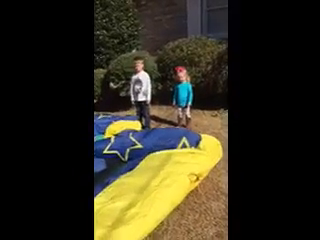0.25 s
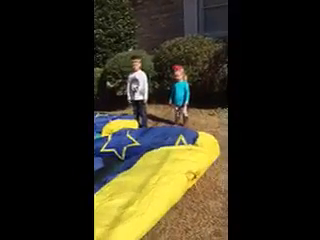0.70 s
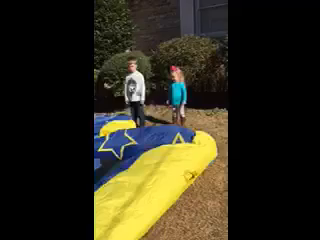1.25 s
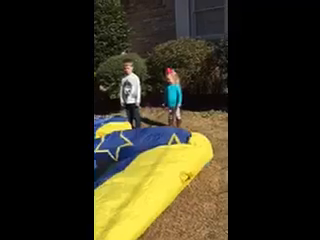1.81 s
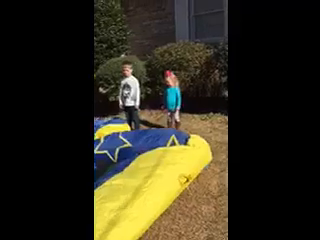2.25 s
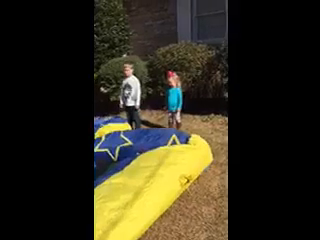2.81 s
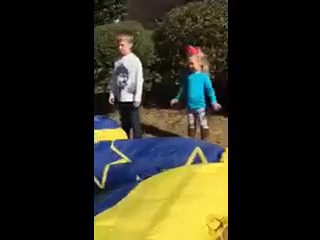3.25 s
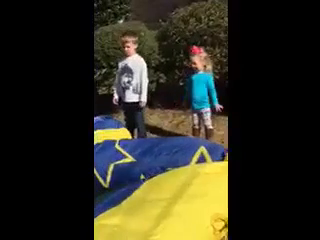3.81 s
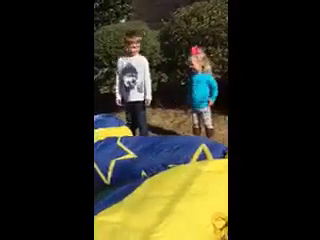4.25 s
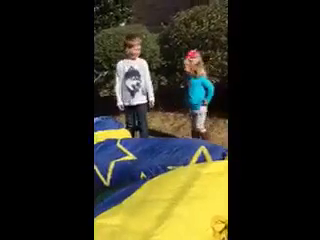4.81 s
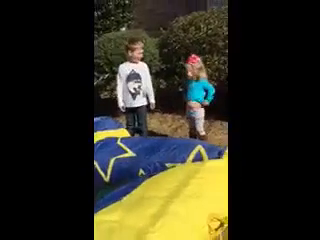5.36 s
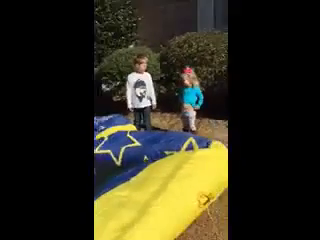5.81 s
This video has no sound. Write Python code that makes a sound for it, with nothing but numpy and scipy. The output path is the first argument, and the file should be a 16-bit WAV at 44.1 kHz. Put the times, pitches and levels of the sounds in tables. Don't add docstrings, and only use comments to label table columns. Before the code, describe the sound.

An electric blower roars steadily outdoors, inflating a large bag, with a broad airy rush, nasal whine and faint flickering blade tones throughout.

```python
import sys
import numpy as np
from scipy import signal
from scipy.fft import rfft, irfft, next_fast_len
from scipy.io import wavfile
from scipy.ndimage import uniform_filter1d, map_coordinates

SR = 44100
rng = np.random.default_rng(int(sys.argv[2]) if len(sys.argv) > 2 else 0)


def bounce(signal):
    frames = np.transpose(np.atleast_2d(signal))
    limited = np.clip(frames, -1, 1)
    pcm = np.round(limited * 32767).astype(np.int16)
    wavfile.write(sys.argv[1], SR, pcm)


def invert_db(level):
    return 10 ** (np.asarray(level, dtype=float) / 20)


N = 267246
TIME_S = np.arange(N) / SR

# (time [s], level [dB])
BAG_PRESSURE = [(0, 0), (.3, 1), (.55, -2.5), (.9, -0.5), (1.15, 1.5), (1.35, 1), (1.95, -0.1), (2.3, 0),
                (2.7, 1.2), (3.15, -1), (3.55, 0.5), (3.85, -1.6), (4.1, -2), (4.4, 1.9), (4.85, -1.4),
                (5.2, 2.5), (5.5, -0.5), (6.06, 1)]
# (time [s], strength [dB])
INLET_GULPS = [(.3, 5.5), (.61, -1), (1.19, 2), (1.49, 6), (2.24, 5.5), (2.79, 3), (3.22, 0.5), (4.05, 2),
               (5.15, 4.5), (5.39, 6), (5.84, 3.5)]

# (frequency [Hz], density [dB per Hz])
DUCT_SPECTRUM = [(8.8, -47.5), (15, -18.5), (75, -10), (162, -1.5), (232, -2.5), (292, -1.5), (328, 1.5),
                 (470, -9), (610, -43.5), (1030, -120)]
INLET_SPECTRUM = [(380, -38.5), (450, -6.5), (540, -2), (640, -2.5), (780, -7.5), (900, -6), (960, -4.5),
                  (1100, -9), (1270, -5.5), (1450, -6.5), (1600, -7.5), (2000, -39.5)]
HOUSING_SPECTRUM = [(1400, -24.5), (1600, -3), (1690, 0.5), (1930, -1), (2000, -5), (2200, -10),
                    (2600, -32)]
EDGE_SPECTRUM = [(1400, -32), (1900, -1), (2100, -0.5), (2480, -3), (2590, -5.5), (2700, -5.5), (3250, -13),
                 (3600, -21.5), (4000, -32), (4500, -37), (5300, -45.5), (6200, -61.5)]
HISS_SPECTRUM = [(4600, -20.5), (5400, -4.5), (5900, -1), (6300, -1), (6700, -2.5), (7100, -7),
                 (7450, -17.5), (7700, -24.5), (7800, -42)]

# (time [s], peak level [dB], length [s])
FIRST_SINGING = [(.2, -45, .15), (.5, -47, 0.27), (2.4, -57, .2), (3.0, -55, 0.29), (3.45, -42, 0.11),
                 (3.8, -56, 0.23), (4.05, -46, .15), (4.67, -48, 0.27), (5.12, -49.5, 0.12),
                 (5.5, -50, 0.4), (5.86, -42.5, 0.27)]
SECOND_SINGING = [(.45, -52, .2), (1.373, -46, 0.23), (1.796, -47.5, 0.26), (2.063, -45, 0.1),
                  (2.4, -48, 0.18), (2.7, -44.5, 0.14), (3.15, -51, .4), (3.73, -50.5, .3),
                  (4.054, -42.5, 0.13), (4.523, -43.5, .25), (4.854, -46, 0.32), (5.25, -50.5, 0.18),
                  (5.603, -46, 0.46)]
THIRD_SINGING = [(.5, -46, 0.19), (.9, -50, 0.14), (1.295, -43.5, 0.21), (1.68, -46, 0.3), (2.0, -44, 0.38),
                 (2.5, -41.5, 0.23), (3.098, -42, 0.23), (3.982, -47, 0.22), (4.2, -45.5, 0.17),
                 (4.536, -44, 0.25), (4.8, -45.5, 0.21), (5.397, -51.5, 0.2), (6.007, -49.5, .2)]
FAINT_TONES = [-62.5, -62, -59.5]
SHAFT_ORDERS = (6, 9.1, 16, 18, 38, 48)
SHAFT_LEVELS = [-57.5, -60.5, -59.5, -60.5, -61.5, -65]

# (time [s], pitch [Hz], peak level [dB], life [s])
RINGING_EDDIES = [(0.103, 301, -34, 0.04), (0.181, 323, -28, 0.04), (0.279, 345, -30.2, 0.045),
                  (0.567, 1690, -30, 0.034), (0.816, 291, -33, 0.05), (0.946, 280, -29, 0.044),
                  (1.127, 291, -28, 0.016), (1.53, 269, -27, 0.018), (1.863, 1949, -34, 0.029),
                  (2.693, 323, -32, 0.061), (2.753, 280, -28.5, 0.038), (2.887, 301, -27, 0.028),
                  (3.108, 1949, -32.4, 0.022), (3.221, 1281, -29.5, 0.022), (3.457, 301, -30, 0.022),
                  (3.554, 183, -32.5, 0.024), (3.746, 1723, -30.5, 0.021), (3.773, 323, -30.5, 0.018),
                  (3.894, 1766, -37, 0.05), (3.902, 291, -30, 0.022), (4.303, 258, -27.5, 0.016),
                  (4.493, 301, -30, 0.025), (4.57, 301, -27, 0.026), (5.077, 269, -36, 0.055),
                  (5.151, 614, -27.5, 0.022), (5.222, 280, -25.5, 0.046), (5.4, 517, -29.5, 0.021),
                  (5.556, 312, -30.8, 0.04), (5.669, 334, -29.5, 0.044), (6.019, 1949, -31, 0.02)]
# (time [s], pitch [Hz], peak level [dB], life [s])
SHED_EDDIES = [(0.253, 1780, -31, 0.022), (0.939, 1680, -36, 0.029), (1.316, 1944, -35, 0.04),
               (1.335, 1700, -33.2, 0.034), (1.454, 1766, -33.3, 0.04), (1.638, 1936, -32.5, 0.04),
               (1.789, 1916, -32.6, 0.032), (2.023, 1930, -34, 0.034), (2.083, 1900, -32.8, 0.024),
               (2.127, 1943, -33.0, 0.038), (2.411, 1701, -30, 0.026), (2.502, 1930, -34.5, 0.04),
               (2.726, 1760, -30, 0.0137), (2.816, 1830, -31, 0.038), (2.935, 1740, -32.5, 0.04),
               (3.034, 1940, -30, 0.024), (3.088, 1894, -33.2, 0.04), (3.426, 1820, -32.9, 0.02),
               (3.815, 1830, -33.4, 0.04), (3.93, 1895, -32.9, 0.032), (3.981, 1930, -33.3, 0.04),
               (4.153, 1916, -35, 0.04), (4.207, 1910, -32.3, 0.016), (4.604, 1700, -28, 0.034),
               (4.892, 1920, -35, 0.04), (4.892, 1886, -30, 0.04), (5.75, 1910, -28, 0.028),
               (5.917, 1780, -32.5, 0.034)]
# (centre [Hz], pitch spread [share], life [s], level [dB])
EDDY_CAVITIES = [(310.4, .1, .035, -47), (601.6, .12, 0.026, -49.5), (998, .2, .02, -48.5),
                 (1811, .05, .018, -44), (2565, .04, 0.019, -54)]


def unit(x):
    return x / np.sqrt(np.mean(x ** 2) + 1e-20)


def wobble(rate):
    knots = rng.standard_normal(int(N * rate / SR) + 4)
    return map_coordinates(knots, [np.arange(N) * rate / SR])


def bumps(rows, length_s=None):
    t = np.arange(0, N + 64, 64) / SR
    total = sum(row[1] * np.exp(-(2 * (t - row[0]) / (length_s or row[2])) ** 2) for row in rows)
    return np.interp(TIME_S, t, total)


def coloured(x, spectrum):
    size = next_fast_len(N + 8192)
    hz, db = np.transpose(spectrum)
    log_hz = np.log(np.fft.rfftfreq(size, 1 / SR) + 1)
    gain = invert_db(np.interp(log_hz, np.log(hz + 1), db, left=-200, right=-200))
    return irfft(rfft(x, size) * gain, size)[:N]


def turbulence(spectrum, patchy_db, flutter_db):
    z = signal.stft(rng.standard_normal(N + 512), nperseg=512)[2]
    patches = uniform_filter1d(rng.standard_normal(z.shape), size=4, axis=0)
    patches = uniform_filter1d(patches, size=8, axis=1)
    noise = signal.istft(z * invert_db(patchy_db * unit(patches)), nperseg=512)[1][:N]
    return unit(coloured(noise * invert_db(flutter_db), spectrum))


def flow_levels():
    pressure = np.interp(TIME_S, *np.transpose(BAG_PRESSURE))
    gulp = bumps(INLET_GULPS, length_s=0.02)
    burst = bumps([(s, 1, life_s) for s, _, _, life_s in SHED_EDDIES])
    roar_db = -35.5 - 0.7 + 0.9 * pressure - gulp + 0.3 * wobble(8)
    filling_db = 0.2 * (np.arange(N) - N / 2) / SR
    rush_db = -38 + filling_db + gulp + 0.15 * wobble(3.1) + 0.72 * wobble(14)
    whine_db = -37.5 - 0.8 - 0.97 * pressure + 0.34 * burst + 0.54 * wobble(14)
    edge_db = -43.5 - 0.33 * pressure + burst + 0.54 * wobble(17)
    return roar_db, rush_db, whine_db, edge_db


def duct_roar(level_db):
    return invert_db(level_db + 0.08) * turbulence(DUCT_SPECTRUM, patchy_db=1.5, flutter_db=0.57 * wobble(20))


def inlet_rush(level_db, jet):
    return invert_db(level_db + 0.78) * turbulence(INLET_SPECTRUM, patchy_db=1.7, flutter_db=0.6 * jet)


def housing_whine(level_db, eddies):
    return invert_db(level_db - 1.3) * turbulence(HOUSING_SPECTRUM, patchy_db=2.5, flutter_db=eddies)


def vortex_shedding(level_db, eddies):
    centre_hz, roam_hz, width_hz = 1799, 89.9, 70
    phase = 2 * np.pi * np.cumsum(centre_hz + roam_hz * wobble(22)) / SR
    whistle = wobble(width_hz) * np.cos(phase) + wobble(width_hz) * np.sin(phase)
    return invert_db(level_db - 8.5 + 0.34 * eddies) * unit(whistle)


def edge_noise(level_db, jet, eddies):
    flutter_db = 0.26 * jet + 1.0 * eddies
    return invert_db(level_db + 0.5) * turbulence(EDGE_SPECTRUM, patchy_db=1.6, flutter_db=flutter_db)


def thin_hiss(swell_db, jet, eddies):
    level_db = -82 + 0.4 * (swell_db - swell_db.mean())
    return invert_db(level_db) * turbulence(HISS_SPECTRUM, patchy_db=2.3, flutter_db=1.1 * eddies + 0.6 * jet)


def airflow():
    roar_db, rush_db, whine_db, edge_db = flow_levels()
    eddies = 1.2 * wobble(55) + 0.4 * wobble(13)
    jet = 1.3 * wobble(40)
    air = duct_roar(roar_db) + inlet_rush(rush_db, jet)
    air = air + housing_whine(whine_db, eddies) + vortex_shedding(whine_db, eddies)
    air = air + edge_noise(edge_db, jet, eddies)
    return air + thin_hiss(whine_db + 0.6 * edge_db - 0.4 * rush_db, jet, eddies)


def singing_db(rows, faint_db):
    swells = bumps([(s, invert_db(db), 0.95 * length_s) for s, db, length_s in rows])
    return 20 * np.log10(invert_db(faint_db) + swells)


def shaft_tone(shaft, order, level_db):
    strength = np.sqrt(2) * invert_db(level_db + 3 * wobble(18))
    return strength * np.sin(order * shaft + 0.4 * wobble(6.5))


def blade_tones():
    blades, loaded_hz, spare_hz, settle_s = 12, 645.2, 6.7, 2.1
    pass_hz = loaded_hz + spare_hz * np.exp(-TIME_S / settle_s)
    shaft = 2 * np.pi * np.cumsum(pass_hz) / SR / blades
    out = np.zeros(N)
    singing = (FIRST_SINGING, SECOND_SINGING, THIRD_SINGING)
    for multiple, (rows, faint_db) in enumerate(zip(singing, FAINT_TONES), start=1):
        out += shaft_tone(shaft, blades * multiple, singing_db(rows, faint_db) - 0.6)
    for order, db in zip(SHAFT_ORDERS, SHAFT_LEVELS):
        out += shaft_tone(shaft, order, db + 3 * wobble(3))
    return out


def eddy_notes(when_s, pitch_hz, gain, life_s):
    t = (np.arange(4096) - 2048) / SR
    age = t / np.reshape(life_s, (-1, 1))
    slide = 0.05 * rng.standard_normal((len(when_s), 1))
    phase = 2 * np.pi * pitch_hz[:, None] * t * (1 + slide * age / 2)
    wave = gain[:, None] * np.exp(-2.7 * age ** 2) * np.sin(phase)
    at = (when_s * SR).astype(int)[:, None] + np.arange(4096)
    return np.bincount(at.ravel(), wave.ravel(), N + 4096)[2048:N + 2048]


def strong_eddies(rows, trim_db):
    s, hz, db, life_s = np.transpose(rows)
    return eddy_notes(s, hz, invert_db(db + trim_db), life_s)


def small_eddies(count=150):
    out = np.zeros(N)
    for centre_hz, spread, life_s, level_db in EDDY_CAVITIES:
        when, size = rng.random((count, 2)).T
        pitch_hz = centre_hz * np.exp(spread * rng.standard_normal(count))
        gain = invert_db(-2.5 * np.log(size + 0.011))
        out += invert_db(level_db) * unit(eddy_notes(when * N / SR, pitch_hz, gain, life_s))
    return out


def scene():
    eddies = strong_eddies(RINGING_EDDIES, -1.5) + strong_eddies(SHED_EDDIES, -3.5) + small_eddies()
    return (airflow() + blade_tones() + eddies)[None]


def low_pass(x):
    return signal.sosfilt(signal.butter(12, 7750, fs=SR, output="sos"), x)


def record(dry):
    return low_pass(dry)


dry = scene()
out = record(dry)
bounce(out)
```